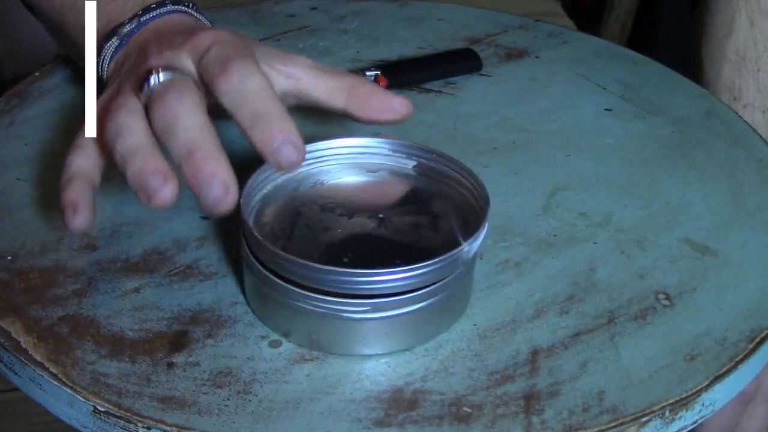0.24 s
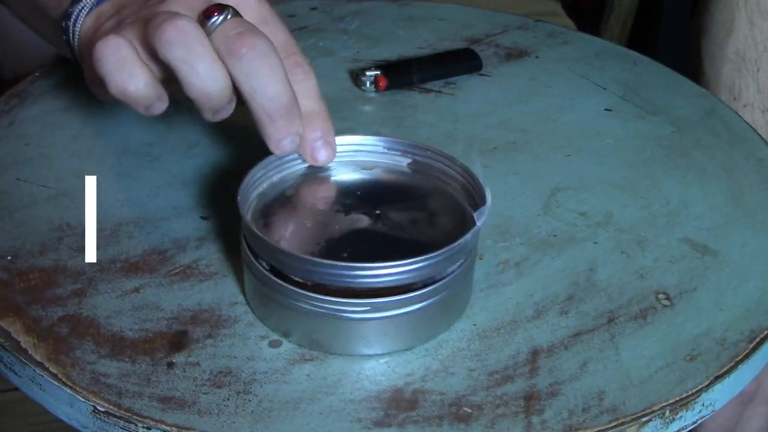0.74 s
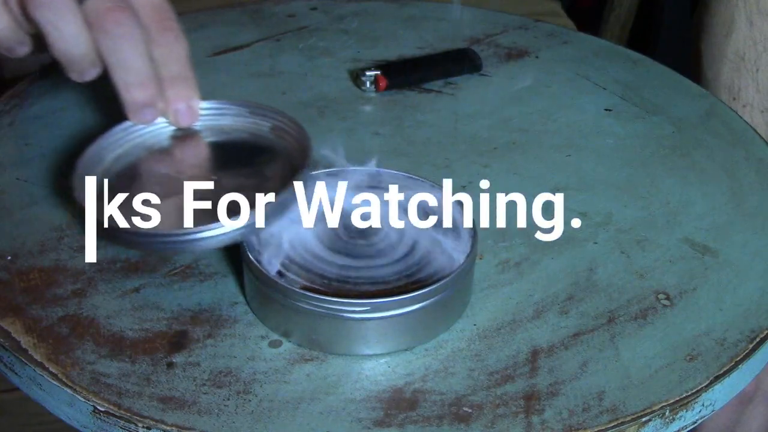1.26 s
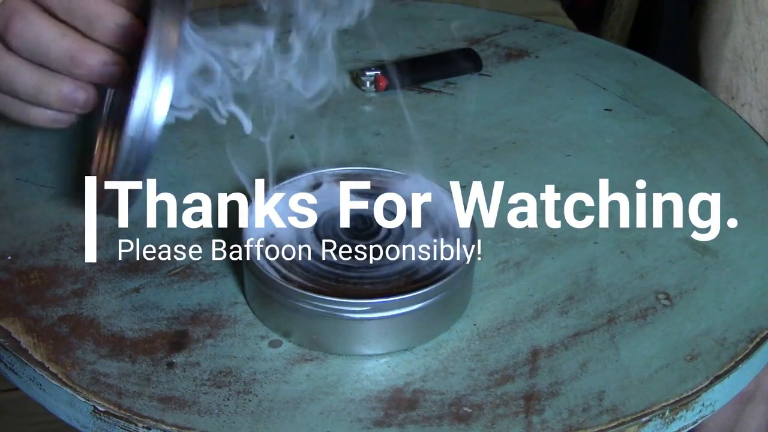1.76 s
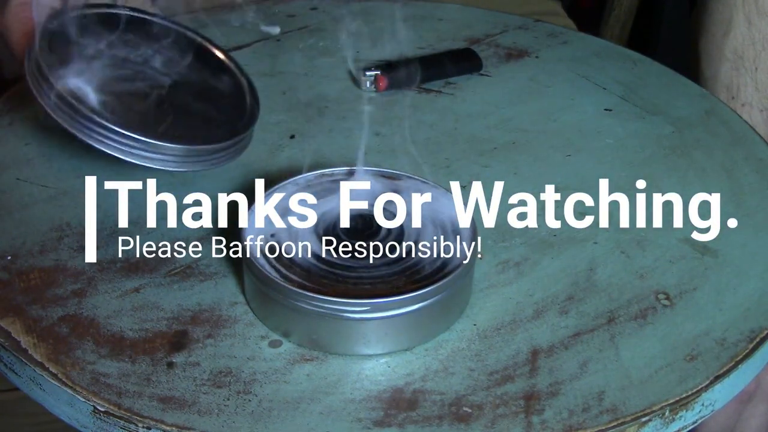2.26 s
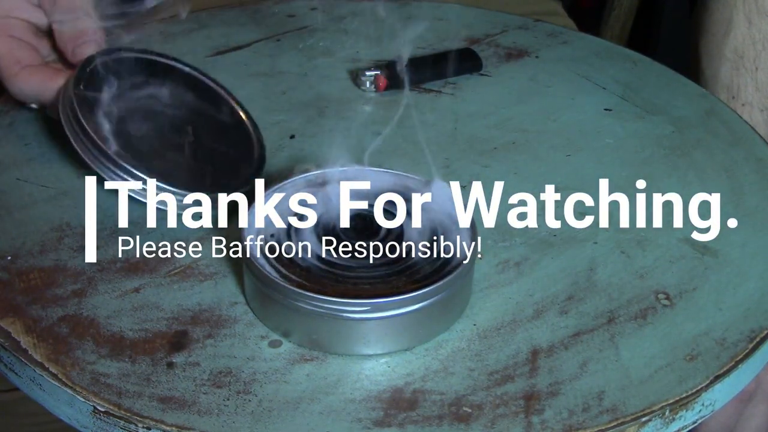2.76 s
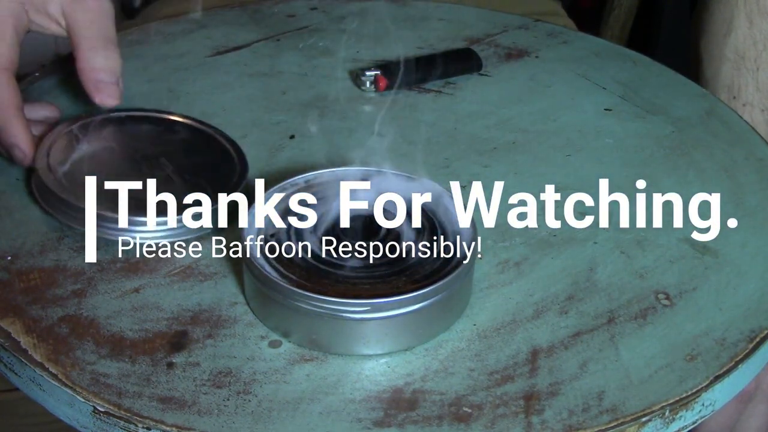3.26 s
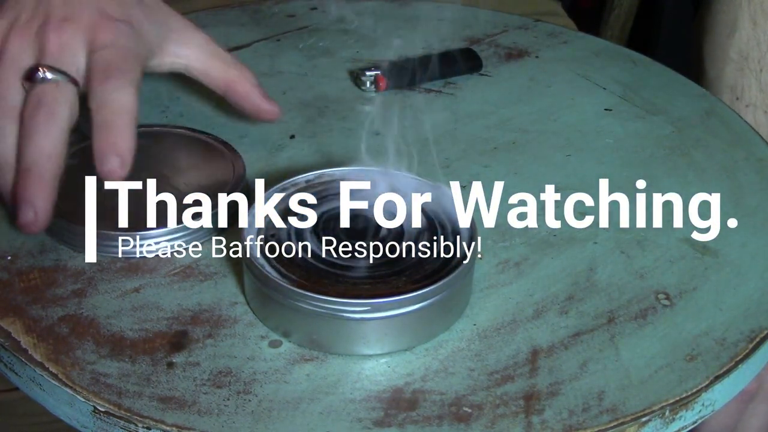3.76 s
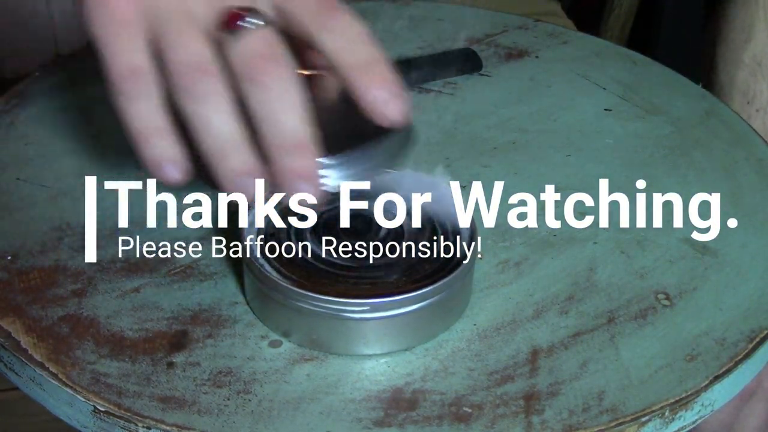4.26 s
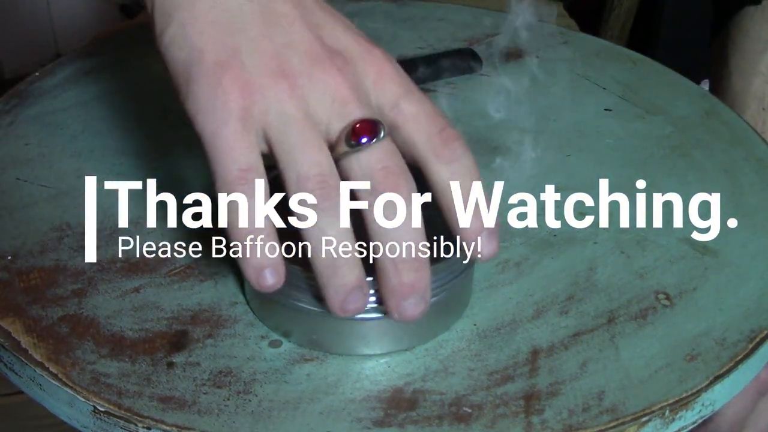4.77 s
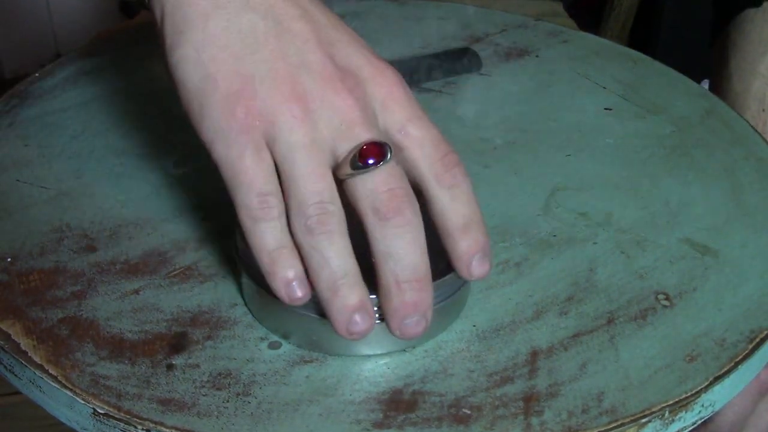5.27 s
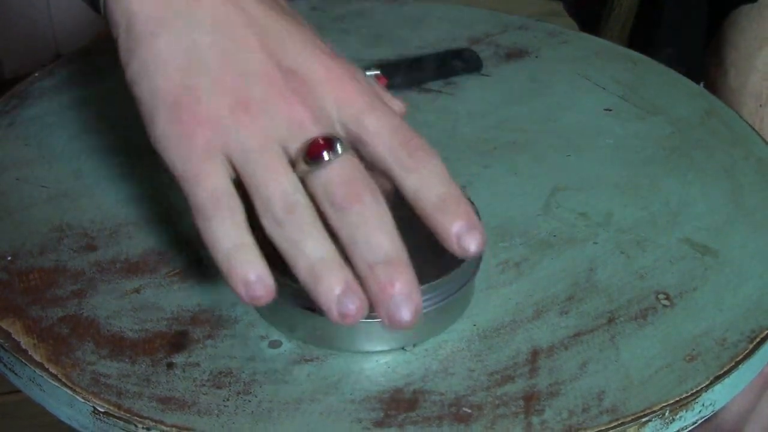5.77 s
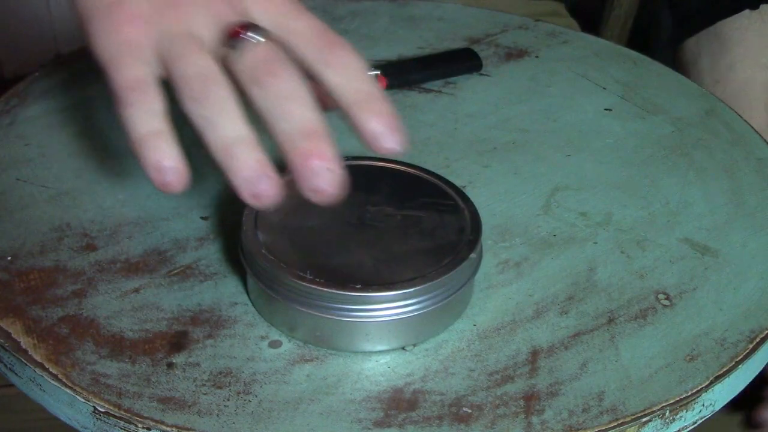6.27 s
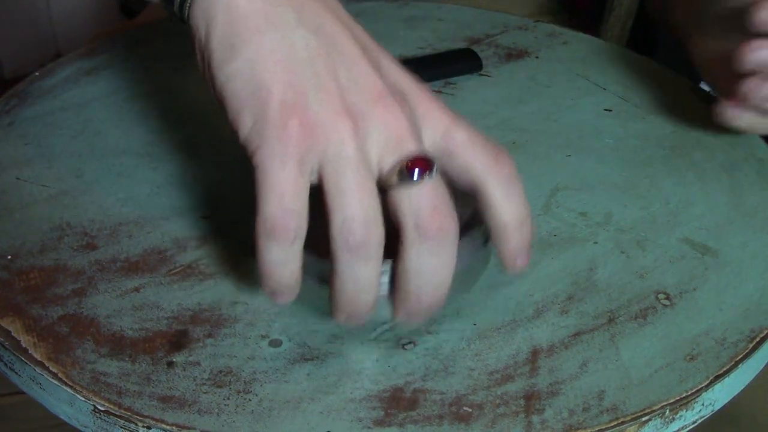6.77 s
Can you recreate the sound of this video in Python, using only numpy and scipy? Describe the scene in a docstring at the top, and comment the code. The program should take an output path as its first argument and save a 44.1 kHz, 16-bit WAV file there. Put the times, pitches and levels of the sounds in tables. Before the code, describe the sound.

A low hum and light hiss fill a small room, with a faint tick at about 0.4 seconds. At 1 second the loose lid of a metal tin clinks against the rim, scrapes lightly, and clinks more brightly at 1.4. Around 1.6 the rim gives one brief, raspy, rising hoot. After a pause, the lid's edge hits a wooden table at 3 seconds with a loud ringing clack, taps lightly, then falls flat with another loud, tinny clack at 3.7. A soft pat at 4.5 leads to a firmer knock at 4.9 as the lid seats on the tin. Dull, hand-damped knocks continue until about 5.7, ending with a soft boom from the table. Fingers brush off the lid at 6 seconds. Two more muffled knocks and low table bumps come around 6.8 to 6.9. The stereo microphone is close.

```python
"""A low room hum and a faint tick; then the loose lid of a round metal tin is slid off, dropped on a
wooden table, picked up and pressed back on. Each contact is a short knock plus the ring of the thin lid.
The rim scrapes, and hoots once by stick-slip as the lid is tipped up. The hand bumps the table, which
booms softly. A small room answers; the stereo microphone is close."""
import sys
import numpy as np
from scipy import signal
from scipy.fft import rfft, irfft
from scipy.io import wavfile
from scipy.ndimage import uniform_filter1d

SR = 44100
rng = np.random.default_rng(int(sys.argv[2]) if len(sys.argv) > 2 else 0)


def to_wav(sig):
    """Store sig (one row per channel, or 1-D mono) as 16-bit WAV at the path in sys.argv[1].

    Samples outside -1..1 are clipped; the rate is SR.
    """
    pcm = np.clip(np.atleast_2d(sig), -1, 1) * 32767
    pcm = np.round(pcm).astype(np.int16)
    wavfile.write(sys.argv[1], SR, pcm.T)  # frames by channels


N = 309743
FREQS_HZ = np.fft.rfftfreq(N, 1 / SR)
TIME_S = np.arange(N) / SR

# room air and microphone hiss: f/Hz, relative density/dB
AIR_SPECTRUM = [(20, -7), (56, -19.5), (78, -8.5), (108, -15), (150, -19.5), (200, -17.5), (390, -22),
                (850, -25.5), (1500, -28), (8300, -34), (15800, -39.5)]
# likeness of the air in the two channels: f/Hz, correlation
AIR_CORRELATION = [(60, -0.59), (150, 0.31), (380, 0.27), (950, 0.14), (2380, 0.036), (5980, 0.12),
                   (15000, -0.14)]
# hum: f/Hz, rms level/dB, left minus right/dB
HUM_LINES = [(52.4, -54, 6.5), (59.6, -63, 7), (120, -69, 2), (180, -74, 0), (1200, -70.5, 0),
             (1320, -72.5, 0), (1441, -74.5, 0)]

# lid modes, many in beating pairs, plus one short wooden knock of the table near 1.5 kHz: f/Hz
MODE_HZ = [585, 638, 880, 951, 968, 1008, 1402, 1520, 1899, 1990, 2030, 2337, 2469, 2646, 2672, 2694, 3330,
           3391, 3495, 4133, 4160, 4192, 4958, 5098, 5165, 5856, 6080, 6271, 6912, 7452, 8062, 9524]
# their decay: t60/s
MODE_T60_S = [.06, 0.23, 0.11, 0.21, 0.075, 0.15, 0.093, 0.01, 0.47, 0.17, 0.11, 0.15, 0.45, 0.19, 0.4,
              0.21, 0.24, 0.14, 0.45, 0.12, 0.19, 0.26, 0.08, 0.12, 0.067, 0.19, 0.39, 0.2, 0.11, 0.097,
              .25, 0.3]
# their drive/dB by strike: rim clips tin, edge meets table, lid falls flat, lid seats on tin
MODE_DRIVE_DB = { "rim": [-30, -71, -28, -36, -60, -72, -26, -6, -54, -22.5, -26, -51, -37, -42, -28.5, -38,
                 -34.5, -49, -37.5, -51, -25, -44, -26.5, -15.5, -18, -26, -47, -52, -25, -26, -48, -55],
                 "edge": [-32, -55, -43.5, -29.5, -50, -46, -24.5, -1, -48, -17.5, -20, -41, -60, -19, -41,
                 -32, -40, -16, -58, -22, -36, -28.5, -32, -16, -53, -48, -46, -56, -57, -55.5, -50, -55],
                 "flat": [-15.5, -28, -18.5, -17, -1, -12, -38, -13.5, -39, -19, -12, -20, -30.5, -18.5,
                 -28, -25, -32, -51, -72, -32.5, -41, -24.5, -15.5, -12.5, -48, -50.5, -38, -26, -41, -50,
                 -49, -33], "seat": [-21, -27.5, -32, -17, -33, -56, -32, 4.5, -45, -15, -17, -24.5, -40,
                 -22, -36, -16, -34, -34, -37, -59, -46, -51, -42, -52, -54, -65, -54, -57, -64, -55, -60,
                 -60]}
# colour of all knocks: f/Hz, gain/dB
KNOCK_SPECTRUM = [(40, 5), (110, -5.5), (250, -4), (335, 2), (420, -9.5), (540, -2), (800, -1.5),
                  (1150, -3.5), (1600, 0.5), (2300, -3), (3500, -4.5), (5100, -2), (6500, 2), (9000, -4.5),
                  (16000, -1)]
# prominence of the modes within a knock, by strike: gain/dB
TINNY_DB = {"rim": 13, "edge": 11, "flat": 5, "seat": 3}
# clink body at 250 Hz, by strike: gain/dB
THUD_DB = {"rim": -1.5, "edge": -14.5, "flat": -10, "seat": -16}
# clink treble from 4 to 11 kHz, by strike: change/dB
TREBLE_FALL_DB = {"rim": -10, "edge": -25, "flat": -19.5, "seat": -52}
# lid strikes tin or table: t/s, knock level/dB, gain at 4 kHz/dB, knock t60/s, ring level/dB, strike
LID_CLINKS = [(0.3551, -8, -18.5, 0.023, -50, "edge"), (.9895, 2.5, -8.5, 0.026, -13.5, "rim"),
              (1.1334, -14.5, -13.5, 0.017, -23.5, "rim"), (1.1938, -18, -4, .05, -30.5, "rim"),
              (1.3819, 7, -.5, 0.019, -1.5, "rim"), (2.958, 19, -3.5, .017, 2.5, "edge"),
              (2.973, 7, -4, 0.06, -30, "edge"), (3.1643, -5, -26, 0.027, -24.5, "edge"),
              (3.6546, 18, 1, 0.036, -0.5, "flat"), (4.167, -29, -36, .03, -44.5, "flat"),
              (4.8797, 5.5, -16, 0.017, -19.5, "seat")]
# dull knocks of lid and tin under the hand: t/s, level/dB, gain at 250 Hz/dB
HAND_PATS = [(4.5399, -10.5, 10), (4.9629, -8, -3), (5.1916, -15.5, 5.5), (5.4669, -11, 7), (5.505, -17, 6),
             (5.616, -11, 2), (5.63, -5, 11.5), (5.646, -3.5, 10), (6.7598, -14.5, 4), (6.9253, -8.5, 0)]
# fingers brush off the closed lid: t/s, level/dB, t60/s
FINGER_BRUSHES = [(5.9817, -12.5, 0.22), (6.0178, -2, 0.024), (6.035, -13.5, 0.18)]

# strokes of the rim over the tin: start/s, length/s, level/dB
RIM_STROKES = [(1.128, 0.048, -51), (1.189, 0.019, -47.5), (1.258, 0.069, -37.5)]
# metal-on-metal slips: f/Hz, gain/dB
SLIP_SPECTRUM = [(500, -14), (1500, -17), (3000, -14), (5300, -2), (9000, 0), (13000, 2.5), (16000, -13)]
# rasp of the hoot: f/Hz, gain/dB
RASP_SPECTRUM = [(250, -21), (480, -10), (680, 6), (950, -20), (1130, 0), (1320, -7), (1650, -15.5),
                 (2060, -9), (2500, -21.5), (3500, -41), (6000, -57)]
# hand bumps the table: t/s, level/dB
HAND_BUMPS = [(5.641, -39), (5.80, -49), (5.944, -45.5), (6.762, -40.5), (6.815, -46), (6.894, -48.5)]
# table top modes: f/Hz, t60/s, level/dB
TABLE_MODES = [(43.3, 0.89, -1.5), (58.3, 0.41, 0.5), (79, 0.29, 3), (119.6, 0.62, -2.5), (228, .3, -18),
               (300.6, 0.36, -14.5), (537, 0.12, -13)]

# room decay: f/Hz, t60/s
ROOM_DECAY = [(100, 0.52), (600, 0.27), (1500, 0.3), (4000, .25), (8000, 0.24), (15000, 0.13)]
# balance at the microphone: f/Hz, left minus right/dB
MIC_BALANCE = [(300, 1.5), (1000, -0.1), (2200, 2), (4500, -0.5), (8000, 3)]
# phase lead of the left channel: f/Hz, lead/rad
MIC_LEAD = [(100, 0), (600, 0.45), (1200, 0.33), (2300, 1.06), (4500, 0.24), (7500, 4), (15000, 3.5)]


def gain_of(db):
    """Decibels to amplitude."""
    return 10 ** (np.asarray(db) / 20)


def decay(t_s, t60_s):
    """Exponential fall, 60 dB per t60."""
    return np.exp(-np.log(1000) * t_s / t60_s)


def unit_rms(x):
    """Scales to rms 1."""
    return x / np.sqrt(np.mean(x ** 2) + 1e-20)


def read(points, hz):
    """Interpolates a table of f/Hz, value on a log axis."""
    f, value = np.transpose(points)
    return np.interp(np.log(hz + 1), np.log(f + 1), value)


def add(mix, start_s, sound):
    """Mixes a sound in at start_s."""
    part = mix[round(start_s * SR):][:len(sound)]
    part += sound[:len(part)]


def coloured(x, spectrum):
    """Filters by a table of f/Hz, gain/dB; rms 1."""
    return unit_rms(irfft(rfft(x) * gain_of(read(spectrum, FREQS_HZ)), N))


def wander(rate_hz):
    """Random drift up to about rate_hz; rms 1."""
    return unit_rms(irfft(rfft(rng.standard_normal(N)) * np.exp(-(FREQS_HZ / rate_hz) ** 2), N))


def air_and_hum(air_db=-52, drift_rad=0.7, waver=0.12):
    """Room air, microphone hiss and a wavering hum."""
    left, other = (coloured(rng.standard_normal(N), AIR_SPECTRUM) for _ in range(2))
    alike = read(AIR_CORRELATION, FREQS_HZ)
    right = irfft(alike * rfft(left) + np.sqrt(1 - alike ** 2) * rfft(other), N)
    out = gain_of(air_db) * np.array([left, right])
    for hz, db, pan_db in HUM_LINES:
        phase_rad = 2 * np.pi * hz * TIME_S + drift_rad * wander(2.5)
        line = np.sqrt(2) * np.sin(phase_rad) * (1 + waver * wander(3))
        out += gain_of([[db + pan_db / 2], [db - pan_db / 2]]) * line
    return out


def resonance(hz, mode_hz, width_hz):
    """1 on a mode, towards 0 away from it."""
    return 1 / (1 + ((hz - mode_hz) / width_hz) ** 2)


def knock(thud_db, bright_db, fizz_db, t60_s, tinny_db, size=8192):
    """A burst of fine rattling, coloured by hardness and the lid and wood modes, broad in contact."""
    hz = np.fft.rfftfreq(size, 1 / SR)
    burst = rfft(rng.standard_normal(size) * decay(TIME_S[:size], t60_s))
    unevenness = np.sqrt(uniform_filter1d(abs(burst) ** 2, size=40))
    hardness = [(250, thud_db), (1000, 0), (4000, bright_db), (11000, fizz_db)]
    on_mode = resonance(hz[:, None], np.array(MODE_HZ), width_hz=110).max(axis=1)
    peaks = gain_of(tinny_db * on_mode)
    peaks /= np.sqrt(uniform_filter1d(peaks ** 2, size=300))  # modes gather energy, add none
    log_gain = np.log(gain_of(read(KNOCK_SPECTRUM, hz) + read(hardness, hz)) * peaks / unevenness)
    mirrored = np.r_[log_gain, log_gain[-2:0:-1]]
    minimum_phase = np.exp(np.conj(signal.hilbert(mirrored)))[:len(hz)]  # silent before contact
    return irfft(burst * minimum_phase)[:size // 2]


def ring(hz, t60_s, db, rise_cycles):
    """Decaying modes that build up over their first cycles."""
    t_s = TIME_S[:SR, None]
    swing = np.sin(2 * np.pi * (hz * t_s + rng.random(len(hz))))
    rise = 1 - np.exp(-t_s * hz / rise_cycles)
    return (gain_of(db) * decay(t_s, t60_s) * rise * swing).sum(1)


def contact_ring(strike, bright_db):
    """The lid's ring and the table's short wooden knock; soft contact weakens modes above 1 kHz."""
    hz = np.array(MODE_HZ)
    softness_db = min(bright_db, 0) * np.maximum(np.log(hz / 1000), 0) / np.log(4)
    drive_db = np.array(MODE_DRIVE_DB[strike]) + softness_db
    return ring(hz, np.array(MODE_T60_S), drive_db, rise_cycles=1.33)


def clinks(shimmer_db=-32, shimmer_t60_s=0.14, count=26):
    """Lid on tin or table: knocks, rings. Hard hits also stir the thin sheet's faint upper modes."""
    knocks, rings = np.zeros((2, N))
    shimmer_hz = np.geomspace(6400, 15000, count) * rng.uniform(0.98, 1.02, count)
    upper_db = shimmer_db - 10 * np.log2(shimmer_hz / 6400)
    for start_s, knock_db, bright_db, t60_s, ring_db, strike in LID_CLINKS:
        fizz_db = bright_db + TREBLE_FALL_DB[strike]
        hit = knock(THUD_DB[strike], bright_db, fizz_db, t60_s, TINNY_DB[strike])
        add(knocks, start_s, gain_of(knock_db) * hit)
        add(rings, start_s, gain_of(ring_db) * contact_ring(strike, bright_db))
        add(rings, start_s, ring(shimmer_hz, shimmer_t60_s, upper_db + knock_db + fizz_db, rise_cycles=2))
    return knocks, rings


def stroke(start_s, length_s, attack_s, release_t60_s):
    """Attack, hold and release of one rub."""
    t_s = TIME_S - start_s
    return np.clip(t_s / attack_s, 0, 1) * decay(np.maximum(t_s - length_s, 0), release_t60_s)


def rim_scrape(slips_per_s=2500, ease_db_per_s=152, ring_db=1, hiss_db=-11):
    """Tiny metal-on-metal slips hiss and stir the finger-damped lid and the one wood mode."""
    impulses = rng.standard_normal(N) * (rng.random(N) < slips_per_s / SR)
    envelope = np.zeros(N)
    for start_s, length_s, db in RIM_STROKES:
        easing = gain_of(db - ease_db_per_s * np.maximum(TIME_S - start_s, 0))
        envelope += easing * stroke(start_s, length_s, attack_s=0.017, release_t60_s=0.05)
    slips = coloured(impulses, SLIP_SPECTRUM) * envelope
    body = ring(np.array(MODE_HZ), t60_s=0.06, db=0, rise_cycles=1)
    ringing = signal.fftconvolve(slips, body / np.linalg.norm(body))[:N]
    return gain_of(hiss_db) * slips + gain_of(ring_db) * ringing


def hoot(start_s=1.575, length_s=0.15, attack_s=0.012, jitter=0.056, gating=0.82):
    """Uneven stick-slip climbs in pitch and locks onto a low lid mode, which rings on: tone, rasp."""
    from_hz, lock_hz, lock_s = 465, 637.5, start_s + 0.0644
    locked_db, off_mode_db, after_ring_db = -32, -11.5, -13
    rasp_peak_db, rasp_lag_s, rasp_fall_db_per_s = -34, 0.02, 274.5
    hz = np.interp(TIME_S, [start_s, lock_s], [from_hz, lock_hz])
    tone_db = locked_db + off_mode_db * (1 - resonance(hz, lock_hz, width_hz=7.8))
    rasp_db = rasp_peak_db - rasp_fall_db_per_s * abs(TIME_S - lock_s - rasp_lag_s)
    roughness = np.minimum(gain_of(rasp_db - tone_db), 1)
    phase_rad = 2 * np.pi * np.cumsum(hz * (1 + jitter * roughness * wander(200))) / SR
    tone = gain_of(tone_db) * np.sqrt(2) * np.sin(phase_rad)
    pulsed_noise = rng.standard_normal(N) * (1 + gating * np.cos(phase_rad))
    rasp = gain_of(rasp_db) * coloured(pulsed_noise, RASP_SPECTRUM)
    rubbing = stroke(start_s, length_s, attack_s, release_t60_s=0.013)
    after_ring = gain_of(after_ring_db) * stroke(start_s + length_s, 0, attack_s, release_t60_s=0.6)
    return tone * (rubbing + after_ring), rasp * rubbing


def pats(bright_db=-24.5, ring_db=-31):
    """Lid and tin knock dully, damped by the hand: knocks, rings."""
    knocks, rings = np.zeros((2, N))
    for start_s, db, thud_db in HAND_PATS:
        hit = knock(thud_db, bright_db, fizz_db=-34, t60_s=0.019, tinny_db=TINNY_DB["seat"])
        add(knocks, start_s, gain_of(db) * hit)
        add(rings, start_s, gain_of(db + ring_db) * contact_ring("seat", bright_db))
    return knocks, rings


def table_boom(pan_db=5):
    """The table top's low modes boom under the hand, left of centre."""
    out = np.zeros(N)
    for start_s, db in HAND_BUMPS:
        add(out, start_s, gain_of(db) * ring(*np.transpose(TABLE_MODES), rise_cycles=0.45))
    return out * gain_of([[pan_db / 2], [-pan_db / 2]])


def brushes():
    """Fingers brush off the closed lid in thin bursts of noise."""
    out = np.zeros(N)
    for start_s, db, t60_s in FINGER_BRUSHES:
        burst = knock(thud_db=-36, bright_db=-7.5, fizz_db=-11, t60_s=t60_s, tinny_db=TINNY_DB["seat"])
        add(out, start_s, gain_of(db) * burst)
    return out


def room(x, alike=0.65, gap_s=0.0011, tap_chance=0.1, size=256):
    """Sparse reflections, partly shared by both channels; each band decays at its own rate."""
    onset = np.clip(TIME_S[:SR] / gap_s - 1, 0, 1)
    taps = rng.choice([-1., 1.], (2, SR)) * (rng.random((2, SR)) < tap_chance) * onset
    taps[1] = alike * taps[0] + np.sqrt(1 - alike ** 2) * taps[1]
    hz, t_s, bands = signal.stft(taps, SR, nperseg=size)
    tail = signal.istft(bands * decay(t_s, read(ROOM_DECAY, hz)[:, None]), SR, nperseg=size)[1]
    return signal.fftconvolve(x[None], tail / np.linalg.norm(tail[0]), axes=1)[:, :N]


def microphone(pair):
    """The tin lies slightly left: that channel is earlier and mostly louder."""
    half = gain_of(read(MIC_BALANCE, FREQS_HZ) / 2) * np.exp(0.5j * read(MIC_LEAD, FREQS_HZ))
    return irfft(rfft(pair) * np.array([half, 1 / half]), N)


def scene():
    """Lid, tin and table in the room."""
    clink_knocks, clink_rings = clinks()
    pat_knocks, pat_rings = pats()
    knocks = clink_knocks + pat_knocks + brushes()
    rings = clink_rings + pat_rings
    tone, rasp = hoot()
    rubbing = rim_scrape() + rasp
    direct = knocks + rings + rubbing + tone
    to_room = gain_of(-1.5) * knocks + gain_of(-2) * rubbing + gain_of(-9) * rings + gain_of(-17) * tone
    return microphone(direct + room(to_room)) + table_boom() + air_and_hum()


def record(dry, ceiling=1.4, cutoff_hz=15900):
    """Soft limiter, then low-pass."""
    limited = ceiling * np.tanh(dry / ceiling)
    lowpass = signal.firwin(511, cutoff_hz, window=("kaiser", 9), fs=SR)
    return signal.oaconvolve(limited, lowpass[None], "same")


dry = scene()
out = record(dry)
to_wav(out)
```